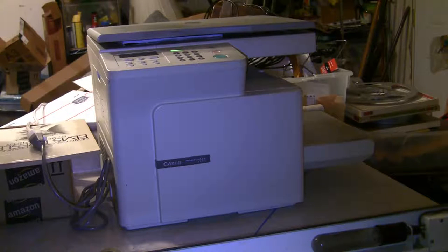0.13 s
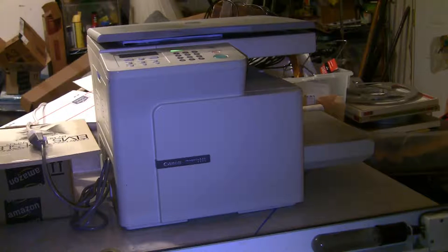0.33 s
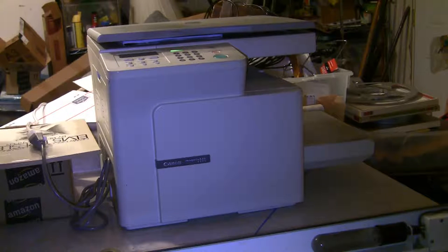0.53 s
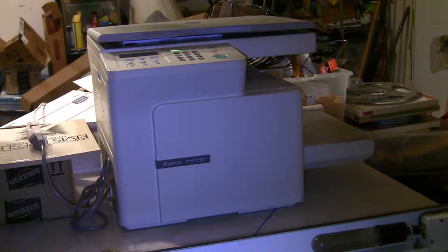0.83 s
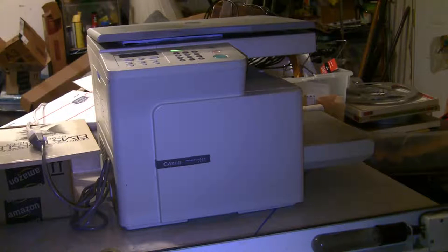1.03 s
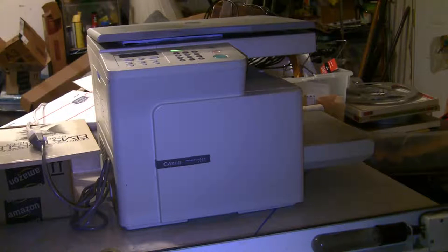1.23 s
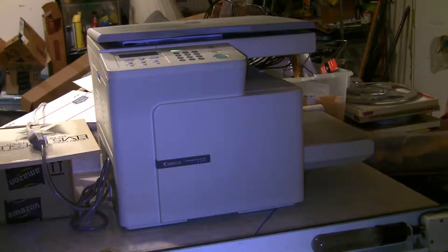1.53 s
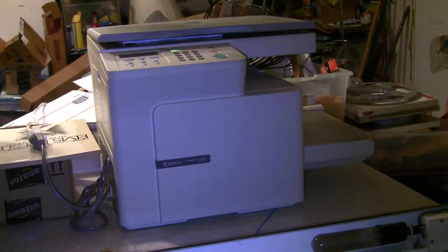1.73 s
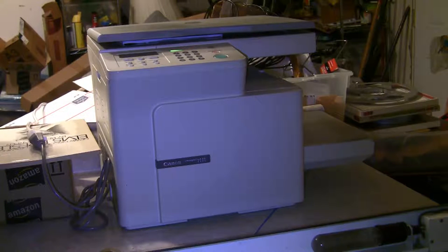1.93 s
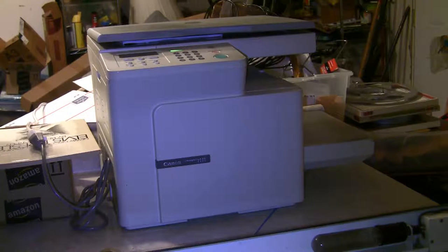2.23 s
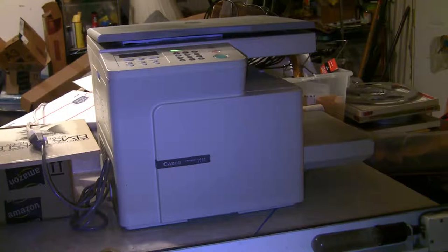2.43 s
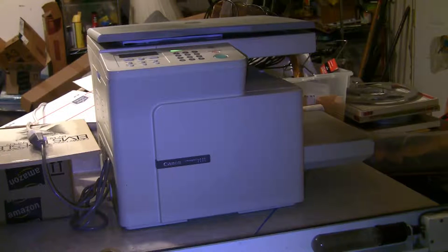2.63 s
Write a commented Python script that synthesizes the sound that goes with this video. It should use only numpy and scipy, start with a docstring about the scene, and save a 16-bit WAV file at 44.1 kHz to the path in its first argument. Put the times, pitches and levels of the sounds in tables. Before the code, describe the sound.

A desktop copier runs throughout, close up in a small room. Its motor holds a constant, dominant whine near 1240 Hz, swelling and dipping slightly, with faint thin high whistles. Beneath are uneven, beating gear hum and a soft, low-weighted fan rush. At about 2.37 seconds a hollow plastic clunk hits, rattling rapidly until 2.52; a brighter metal latch clicks at 2.6, while the whine continues to the end.

```python
"""On a workbench in a small cluttered room, a desktop copier runs. Its stepper motor sings one swelling note, a
fluttering sine, with thin, high whistles from the motor's chopper drive around it, as plain sines. Under it a
gear train hums in uneven tones, and a fan rushes as coloured noise in short-time spectra. Near the end a
solenoid engages, a clutch clunks in the plastic casing, the mechanism rattles into place and a metal latch
clicks: noise bursts with the room's answer and ringing modes."""
import sys
import numpy as np
from scipy import signal
from scipy.fft import rfft, irfft
from scipy.io import wavfile
from scipy.ndimage import uniform_filter1d

SR = 44100
rng = np.random.default_rng(int(sys.argv[2]) if len(sys.argv) > 2 else 0)


def transcribe(signal):
    """Save signal, clipped to [-1, 1], as a 16-bit WAV file at the path in sys.argv[1]."""
    frames = np.atleast_2d(signal).T
    limited = np.clip(frames, -1, 1)
    pcm = np.round(limited * 32767).astype(np.int16)
    wavfile.write(sys.argv[1], SR, pcm)


N = 122157  # length in samples


def amp(db):
    """Decibels to gain."""
    return 10 ** (np.asarray(db) / 20)


def unit(x):
    """Scales to rms 1."""
    return x / np.sqrt(np.mean(abs(x) ** 2) + 1e-20)


def read(points, hz):
    """Reads a table of frequency and value on a log-frequency axis."""
    point_hz, value = np.transpose(points)
    return np.interp(np.log(hz + 1), np.log(point_hz + 1), value)


def wander(rate_hz):
    """Complex noise of rms 1 that drifts slowly, its spectrum falling away above rate_hz."""
    hz = np.fft.fftfreq(N, 1 / SR)
    spectrum = rng.standard_normal(N) + 1j * rng.standard_normal(N)
    return unit(np.fft.ifft(spectrum / (1 + (hz / rate_hz) ** 2)))


def tone(hz, flutter, rate_hz):
    """A sine of rms 1; flutter is the share of wander that unsettles its level and phase."""
    turn = np.exp(2j * np.pi * (hz * np.arange(N) / SR + rng.random()))
    if flutter:
        turn = turn * (1 + flutter * wander(rate_hz))
    return unit(turn.real)


# Swell of the stepper's note. Each row: time in seconds, level in dB before WHINE_GAIN_DB.
WHINE_SWELL = [(0.0, -36), (0.14, -31), (0.18, -32.5), (0.25, -30.5), (0.31, -34), (0.37, -31.5),
               (0.42, -36.5), (0.59, -33), (0.62, -35), (0.84, -33), (0.88, -36.5), (1.06, -31),
               (1.3, -32.5), (1.33, -36), (1.75, -33.5), (1.79, -36.5), (1.97, -31), (2.21, -32.5),
               (2.24, -37), (2.36, -35), (2.38, -31.5), (2.46, -36.5), (2.52, -32.5), (2.56, -36),
               (2.65, -32.5), (2.7, -38), (2.77, -34)]


def whine_db():
    """Swell of the stepper motor at every sample, in dB, straight between the table's points."""
    return np.interp(np.arange(N) / SR, *np.transpose(WHINE_SWELL))


WHINE_HZ, WHINE_GAIN_DB, WHINE_FLUTTER = 1237.65, 0.53, 0.1
DRIVE_FOLLOW = 0.85  # share of the whine's swell, in dB, taken by the drive tones above it

# Tones of the motor's chopper drive and the mains. Each row: frequency in Hz, level in dB.
DRIVE_TONES = [(29.9,-62),(59.9,-66),(119.9,-70),(915,-69),(1061,-71),(2019.9,-68),(2653,-66),(3193.5,-74),(3532.6,-76),(4562,-74),(5128.3,-66),(5175.2,-78),(6543.6,-74),(6590.5,-78),(9018.9,-74),(9065.8,-78),(10434.2,-81),(10481.1,-78),(11653,-85),(12909.5,-82),(12956.4,-79),(14128,-86),(14372,-80),(15543,-87)]


def stepper():
    """The whine swells and sinks; drive tones above it follow in part, those below hold steady."""
    level_db = whine_db()
    sound = amp(level_db + WHINE_GAIN_DB) * tone(WHINE_HZ, WHINE_FLUTTER, rate_hz=19)
    swell = unit(amp(DRIVE_FOLLOW * level_db))
    for hz, db in DRIVE_TONES:
        envelope = swell if hz > WHINE_HZ else 1
        sound += amp(db) * envelope * tone(hz, 0, 0)
    return sound


GEAR_FLUTTER_HZ = 6.7

# Hum of the gear train. Each row: frequency in Hz, level in dB, flutter as a share,
# share of the whine's swell that the tone follows.
GEAR_TONES = [(152.4,-64,0.67,0),(169.9,-61,1,0),(227.3,-51.5,0.82,0),(457.7,-48.5,0.35,1),(472.5,-56.5,0.23,0.76),(440.6,-53,1.23,0.17),(550,-63.5,0.78,0.27),(593,-66,.3,0),(622.3,-62,0.57,0),(687,-57,1,0),(1138,-61.5,.5,0.0062)]


def gears():
    """Meshing gears hum unevenly, some swelling with the motor; close tones beat."""
    level_db = whine_db()
    sound = np.zeros(N)
    for hz, db, flutter, follow in GEAR_TONES:
        swell = unit(amp(follow * level_db))
        sound += amp(db) * swell * tone(hz, flutter, GEAR_FLUTTER_HZ)
    return sound


def stereo_noise(frames, hz, width):
    """Random short-time spectra, partly alike in the two channels."""
    a, b, c, d = rng.standard_normal((4, frames, len(hz)))
    side_gain = amp(read(width, hz))
    mid = a + 1j * b
    side = side_gain * (c + 1j * d)
    return np.array([mid + side, mid - side]) / np.sqrt(1 + side_gain ** 2)


def to_sound(spectra):
    """Short-time spectra to samples, each frame a quarter of a window after the last."""
    size = 2 * (spectra.shape[2] - 1)
    return signal.istft(spectra.swapaxes(1, 2), nperseg=size, noverlap=size - size // 4)[1]


def causal(x, gain):
    """Colours a sound by a minimum-phase filter, without smearing its attack backwards."""
    log_gain = np.log(np.concatenate([gain, gain[-2:0:-1]]) + 1e-7)
    response = np.exp(np.conj(signal.hilbert(log_gain)))[:len(gain)]
    return irfft(rfft(x, len(log_gain)) * response)[:, :x.shape[1]]


# Decay of the room. Each row: frequency in Hz, time to fall by 60 dB in seconds.
ROOM_DECAY = [(150,0.68),(600,0.6),(2500,0.24),(6000,0.43),(15000,0.25)]
ROOM_DB, ROOM_BUILD_S = -7, 0.0057  # level against the direct burst before colouring; build-up time

# Stereo width of the knocks. Each row: frequency in Hz, side minus mid in dB.
KNOCK_SPREAD = [(60,-10),(130,-19),(290,-30),(640,-15),(1400,-11),(3100,-6),(6800,-0.5),(15000,2)]


def strike(bright, colour, modes, body_db, ring_db, t60):
    """One blow: a quick dense ring, the room's answer and a few lasting modes."""
    hz, frames = np.fft.rfftfreq(256, 1 / SR), 400
    age = np.arange(frames)[:, None] * 64 / SR  # seconds since the blow, per frame
    near = to_sound(stereo_noise(frames, hz, KNOCK_SPREAD))
    room_fall = amp(-60 * age / read(ROOM_DECAY, hz))
    far = to_sound(stereo_noise(frames, hz, KNOCK_SPREAD) * room_fall)

    t = np.arange(near.shape[1]) / SR
    fall_db = -60 * t  # divided by a t60 below
    room_build = 1 - np.exp(-t / ROOM_BUILD_S)
    burst = near * amp(fall_db / t60) + amp(ROOM_DB) * far * room_build
    f = np.fft.rfftfreq(2 * len(t), 1 / SR)
    body = causal(unit(burst) / np.sqrt(len(t)), unit(amp(read(colour, f))))

    ring = 0
    for mode_hz, db, life in modes:
        channel_phase = 0.14 * rng.standard_normal((2, 1))
        phase = 2 * np.pi * (mode_hz * t + rng.random()) + channel_phase
        ring = ring + amp(db + fall_db / life) * np.sin(phase)
    ring_onset = 1 - np.exp(-t / 0.0018)
    sound = amp(body_db) * body + amp(ring_db) * ring * ring_onset
    # The brightness tilt turns about 1 kHz and is level below 200 Hz
    return causal(sound, amp(bright * np.log2(np.maximum(f, 200) / 1000)))


def add(mix, s, sound):
    """Mixes a stereo sound in at s seconds, cut at the end of the mix."""
    part = mix[:, round(s * SR):][:, :sound.shape[1]]
    part += sound[:, :part.shape[1]]


# Blows on the casing: the first, at 2.3656 s, is the latch's solenoid engaging, the rest come from the clutch.
# # Each row: start in seconds, level in dB, brightness in dB per octave, extra level of the modes in dB.
CASING_BLOWS = [(2.3656,-7.5,2.5,-2),(2.3705,2,1,-1.5),(2.379,0.5,0.5,3),(2.385,-3,-1,0),(2.392,-13,1,-7),(2.412,-9.5,4,8.5),(2.428,-7,-2,2),(2.456,-5.5,-2,-4),(2.4635,-9,4,-6),(2.469,-8,-1,3),(2.481,-8.5,-4.5,-4.5),(2.503,-10.5,-4.5,-8),(2.522,-12.5,2.5,-5)]
# Colour of the casing's dense ring. Each row: frequency in Hz, relative density in dB per Hz.
CASING_COLOUR = [(60,-21),(140,-18),(240,1.5),(360,-6),(450,-3.5),(800,-2.5),(1300,-5.5),(1900,-8.5),(3000,-13),(4800,-22),(5600,-26.5),(9000,-32),(15500,-49)]
# Clear modes of the casing. Each row: frequency in Hz, relative level in dB, t60 in seconds.
CASING_RING = [(241.7,2,0.3),(421,-6,0.2),(648.5,2.5,0.19),(750,-1,0.13),(794,-1.5,.25),(953,-3.5,.2),(1060,-5,.22),(1178,2,0.15),(1480,-4,0.11),(1768,-3.5,.12),(2345,-14,.12),(4850,-9.5,0.056),(6277,-19,0.15)]
CASING_DB, CASING_RING_DB, CASING_T60 = -1.5, -37.5, 0.057  # dense ring dB, modes dB, dense t60 in s

# Clicks of the latch. Each row: start in seconds, level in dB, brightness in dB per octave.
LATCH_CLICKS = [(2.5952,-4,1.5),(2.5995,1,-1),(2.61,-6.5,0)]
# Colour of the latch's dense ring. Each row: frequency in Hz, relative density in dB per Hz.
LATCH_COLOUR = [(100,-20),(400,-0.5),(1000,-1),(2000,-6),(3000,-9),(3900,-6.5),(4750,-1.5),(5300,-21),(8000,-16.5),(11000,-20),(15500,-12)]
# Clear modes of the latch. Each row: frequency in Hz, relative level in dB, t60 in seconds.
LATCH_RING = [(2376,-4,.3),(3950,-3.5,0.39),(4500,2,0.12),(4620,-6,0.31),(4930,2,0.11)]
LATCH_DB, LATCH_RING_DB, LATCH_T60 = -5, -47.5, 0.047  # dense ring dB, modes dB, dense t60 in s


def mechanism():
    """A solenoid engages, the clutch knocks and rattles the plastic casing; then the metal latch snaps shut."""
    out = np.zeros((2, N))
    for s, db, bright, extra_db in CASING_BLOWS:
        ring_db = CASING_RING_DB + extra_db
        knock = strike(bright, CASING_COLOUR, CASING_RING, CASING_DB, ring_db, CASING_T60)
        add(out, s, amp(db) * knock)
    for s, db, bright in LATCH_CLICKS:
        click = strike(bright, LATCH_COLOUR, LATCH_RING, LATCH_DB, LATCH_RING_DB, LATCH_T60)
        add(out, s, amp(db) * click)
    return out


# Colour of the fan and rollers. Each row: frequency in Hz, relative density in dB per Hz.
FAN_COLOUR = [(20,-31),(60,2.5),(110,-17),(165,1),(200,-6.5),(285,5.5),(345,-6.5),(430,1.5),(520,-5),(700,-4),(1000,-10),(1600,-11),(2300,-20.5),(3400,-17.5),(4200,-23),(5200,-21.5),(6200,-25),(9000,-29.5),(15500,-33)]
# Stereo width of the fan. Each row: frequency in Hz, side minus mid in dB.
FAN_SPREAD = [(30,-2),(60,1),(100,2),(165,-0.5),(270,-9),(450,-4.5),(740,-7),(1200,-3),(2000,-5.5),(3300,-3),(5500,-2.5),(9000,0),(15000,-4.5)]
FAN_DB, FAN_RIPPLE_DB, FAN_PATCH_DB = -45.5, 3.06, 1  # overall level, fixed ripple, drifting patches


def fan():
    """Air and rollers: noise of broad colour, a fine fixed ripple like the room's comb, drifting patches."""
    hz, frames = np.fft.rfftfreq(1024, 1 / SR), N // 256 + 5
    patches = rng.standard_normal((frames, len(hz)))
    patches = uniform_filter1d(patches, size=10, axis=0)  # smooth in time
    patches = unit(uniform_filter1d(patches, size=10, axis=1))  # smooth in frequency
    # One random step per frequency, weaker below 1500 Hz
    ripple = rng.standard_normal(len(hz)) * np.minimum(hz / 1500, 1)
    level_db = read(FAN_COLOUR, hz) + FAN_RIPPLE_DB * ripple + FAN_PATCH_DB * patches
    rush = to_sound(stereo_noise(frames, hz, FAN_SPREAD) * amp(level_db))
    return amp(FAN_DB) * unit(rush[:, :N])


MOTOR_PAN_DB = 0.7  # left minus right


def scene():
    """The whole copier, its motor and gears a little to the left."""
    pan = amp(MOTOR_PAN_DB * np.array([[0.5], [-0.5]]))
    motor = (stepper() + gears()) * pan
    return motor + mechanism() + fan()


EDGE_HZ = 15800


def record(dry):
    """The recorder's band limit: a linear-phase low-pass at EDGE_HZ."""
    low_pass = signal.firwin(511, EDGE_HZ, window=("kaiser", 9), fs=SR)
    return signal.oaconvolve(dry, low_pass[None], "same")


dry = scene()
out = record(dry)
transcribe(out)
```